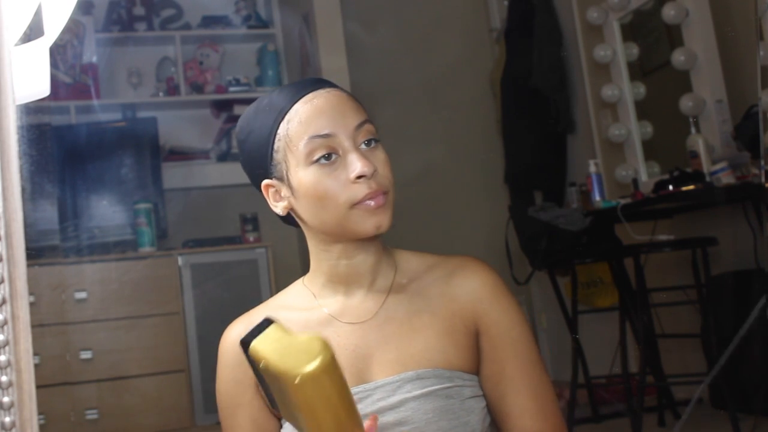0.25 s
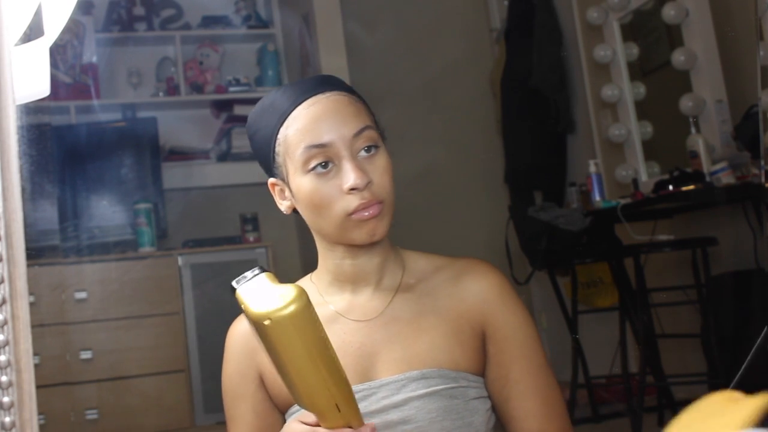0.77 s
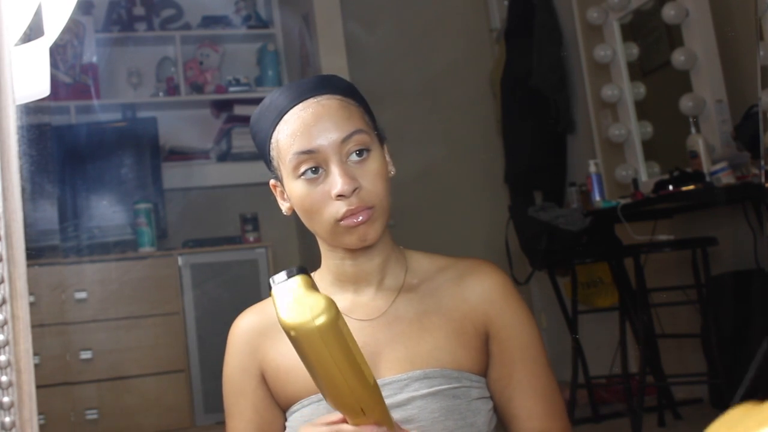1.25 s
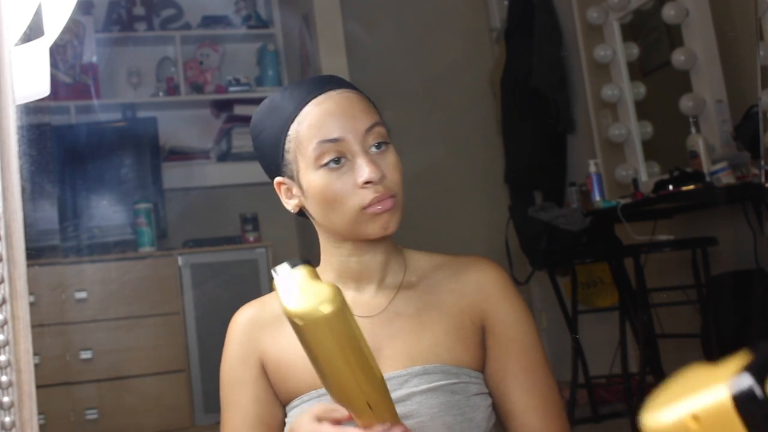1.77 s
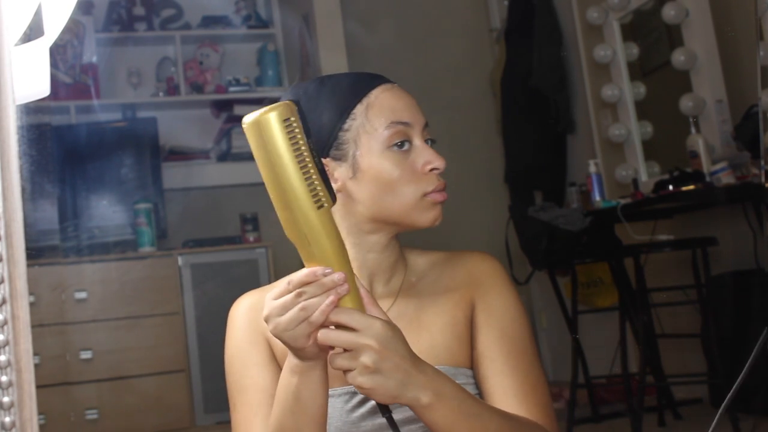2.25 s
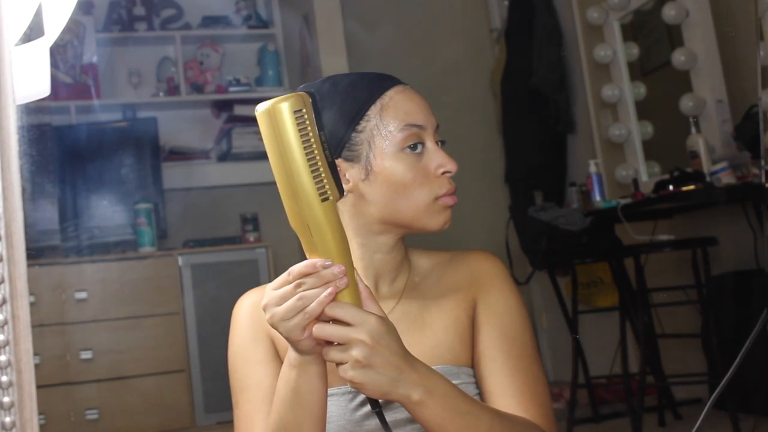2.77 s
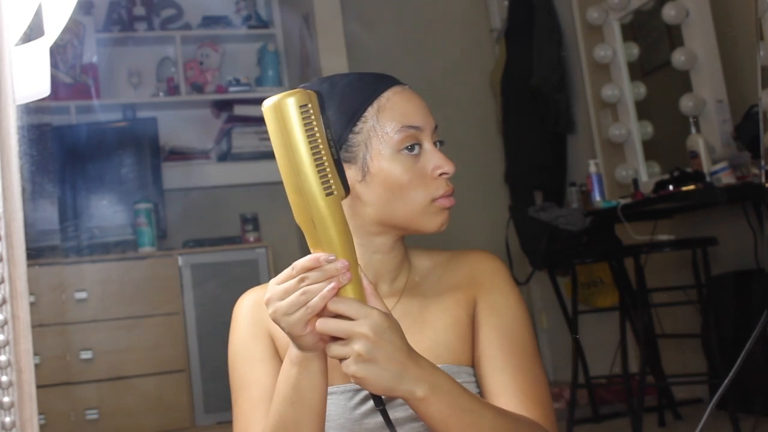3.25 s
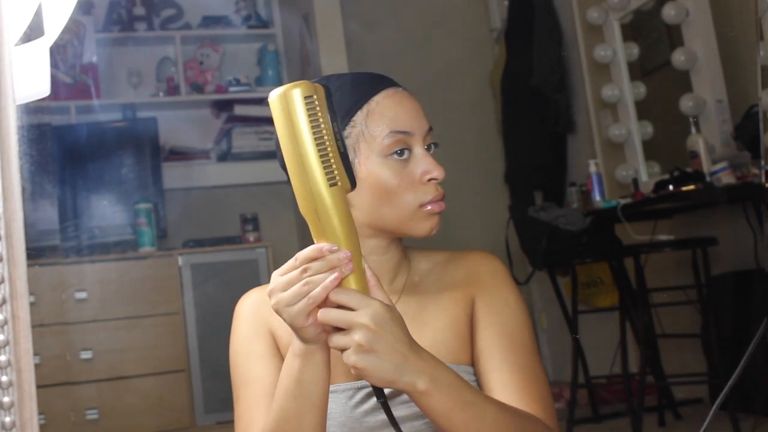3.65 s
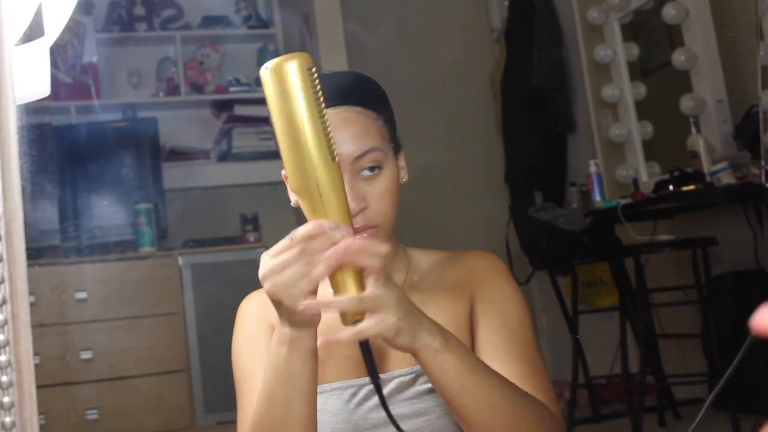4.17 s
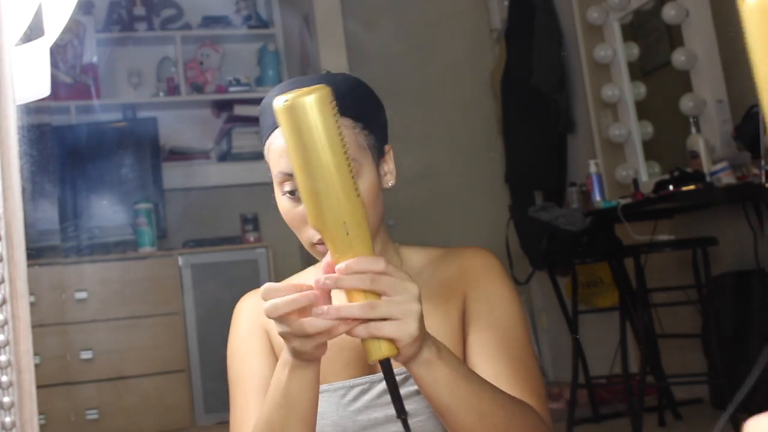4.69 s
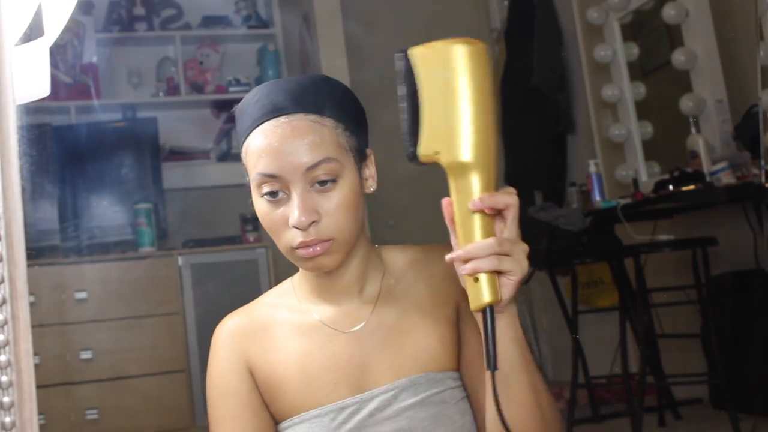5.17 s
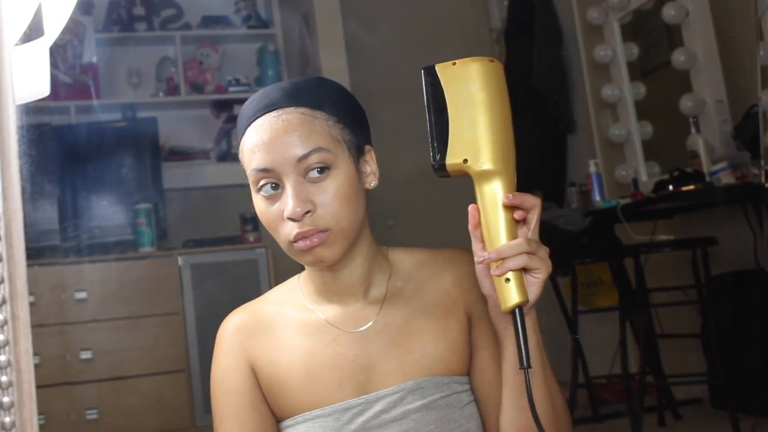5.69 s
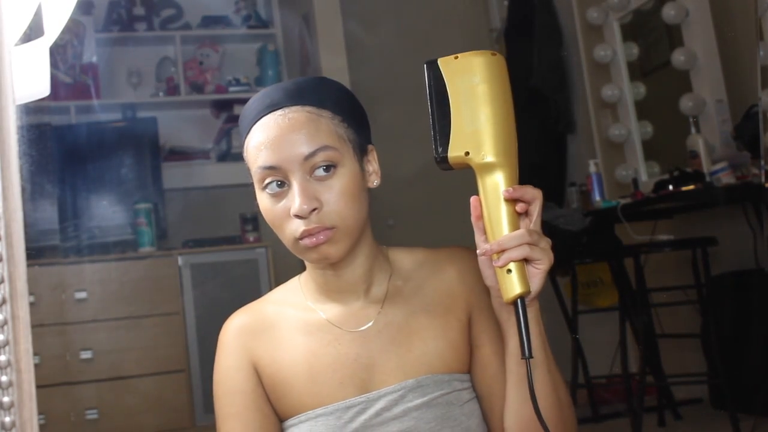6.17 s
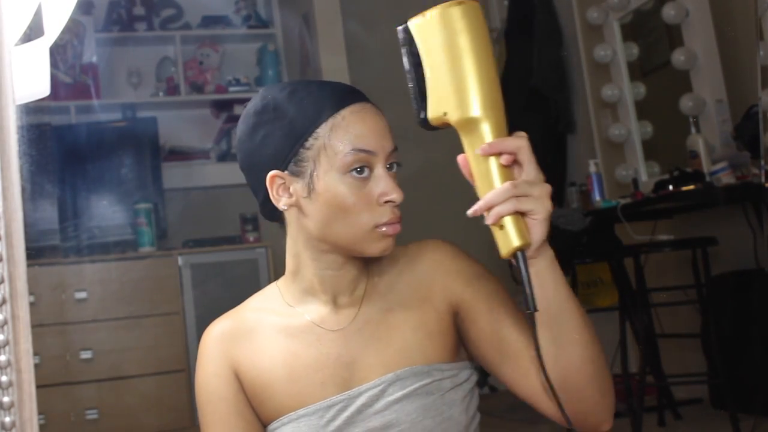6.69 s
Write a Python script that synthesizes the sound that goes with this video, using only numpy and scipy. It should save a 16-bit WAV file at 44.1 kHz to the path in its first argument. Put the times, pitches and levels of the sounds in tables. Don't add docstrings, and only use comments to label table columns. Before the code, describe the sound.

Quiet room tone and small plastic handling ticks come first, then two loud switch clacks close together. The hand-held dryer starts with a quick swelling whoosh and rising whir, settling within half a second into a dense, steady hiss with buzzy motor tones. Midway through, the nozzle swings round and the hiss gets a sharper, more hollow colour, with tiny dips as a hand crosses the intake. Close microphone, short dry room, no speech.

```python
import sys
import numpy as np
from scipy import signal
from scipy.fft import rfft, irfft
from scipy.io import wavfile
from scipy.ndimage import uniform_filter1d

SR = 44100
rng = np.random.default_rng(int(sys.argv[2]) if len(sys.argv) > 2 else 0)


def wav_record(signal):
    frames = np.transpose(np.atleast_2d(signal))
    bounded = np.clip(frames, -1, 1)
    quanta = np.round(bounded * 32767).astype(np.int16)
    wavfile.write(sys.argv[1], SR, quanta)


def linear_from_db(decibels):
    return 10 ** (np.asarray(decibels, float) / 20)


N = 305833
T = np.arange(N) / SR
AIR_ON_S = 1.39
TONE_SWITCH_S = 1.889


def level(x, db):
    return x * linear_from_db(db) / np.sqrt(np.mean(x ** 2))


def curve(table):
    s, *columns = np.transpose(table)
    return [np.interp(T, s, c) for c in columns]


def colour_db(points, hz):
    f, db = np.transpose(points)
    return np.interp(np.log(hz + 1), np.log(f), db)


def bell(x, centre, width):
    return np.exp(-.5 * ((x - centre) / (.5 * width)) ** 2)


def walk(rate, count, size):
    k = max(int(rate), 1)
    x = rng.standard_normal((count, size))
    x = uniform_filter1d(uniform_filter1d(x, k), k)
    return x / x.std()


def shaped(gain_db, size=1024):
    hz, s, spec = signal.stft(rng.standard_normal(N), SR, nperseg=size)
    at = np.minimum((s * SR).astype(int), N - 1)
    noise = signal.istft(spec * linear_from_db(gain_db(hz[:, None], at)), SR, nperseg=size)[1][:N]
    return level(noise, 0)


def ring(x, hz, t60):
    pole = np.exp(2j * np.pi * hz / SR - np.log(1000) / (t60 * SR))
    return signal.lfilter([1], [1, -pole], x).imag


def patches(hz, at, width_hz, hold, patchy_db):
    grid = walk(hold, count=400, size=len(at))
    row = np.minimum(hz[:, 0] / width_hz, 399).astype(int)
    return patchy_db * grid[row]


# time in seconds, shaft speed in Hz under back pressure, air level in dB,
# turn of the nozzle from 0 to 1, housing whine in dB.
HOLD = [(1.9, 337, -21, .1, -8), (2.15, 336.3, -19.5, 0.04, -10), (2.3, 337, -20, 0.02, 3.5),
        (2.62, 334.4, -19.5, 0, 0.5), (2.7, 337.3, -19.5, 0, 2), (3.52, 334.6, -19.8, 0, 0.3),
        (3.56, 337.3, -19, 0, 2), (4.24, 335.1, -20, 0.07, 2), (4.38, 334.7, -19.5, 0.13, -7),
        (4.74, 329.3, -20.5, 0.18, -3.5), (4.93, 334.8, -20, 0.26, -6), (5.08, 347.5, -21, .52, -5),
        (5.5, 339.9, -21, 1, -12), (5.7, 337, -21, 0.96, -12), (5.87, 339.7, -20.5, 1, -3.5),
        (6.1, 337.5, -21.5, .95, -9), (6.7, 338, -21, 0.92, -10), (6.93, 336.7, -20.5, 0.3, -7)]
# centre in seconds, level change in dB.
AIR_DIPS = [
    (4.585, -1),
    (5.4, -0.3),
    (6.75, -1),
]


def fan_motion():
    motor_on_s, spin_up_s, free_hz, full_hz = 1.317, .245, 352, 337
    loaded, air_db, turn, whine_db = curve(HOLD)
    turn = np.clip(turn, 0, 1)
    after = np.clip((T - TONE_SWITCH_S) / .012 + .5, 0, 1)
    shaft = np.clip(free_hz * (1 - np.exp(-(T - motor_on_s) / spin_up_s)), 50, loaded)
    speed = np.log10(np.minimum(shaft / full_hz, 1)) * (1 - after)
    air_db = air_db + 73.5 * speed + (1 - after)
    air_db = air_db - 9 * np.exp(-np.abs(T - AIR_ON_S) / .033)
    air_db = air_db + sum(db * bell(T, s, .028) for s, db in AIR_DIPS)
    whine_db = whine_db + 48 * speed - 4 * (1 - after)
    return shaft, loaded, speed, turn, after, air_db, whine_db


# centre in seconds, length in seconds, frequency in Hz, level in dB.
GLANCES = [(1.58, 0.19, 1460, 8), (1.7, .36, 2640, 6), (1.63, .12, 2950, 3.5), (1.95, 0.18, 5650, 8),
           (2.6, 0.8, 4450, 1.5), (3.6, 0.5, 8700, 3), (3.7, 0.45, 5250, 4), (4.0, 0.29, 2087, 5),
           (4.496, .39, 6240, 5.5), (4.749, 0.32, 5730, 7.5), (5.1, 0.22, 4450, 6), (5.3, 0.4, 6816, 5.5),
           (5.42, 0.36, 5530, 5.5), (5.05, 0.25, 715, 3), (1.98, .2, 4200, 2), (5.5, .29, 4400, 3),
           (6.1, 0.22, 5100, 2), (6.35, 0.27, 3000, 5), (6.551, .35, 7626, 5), (6.58, 0.18, 2210, 3)]


def glances(hz, at):
    return sum(db * bell(hz, f, 220) * bell(T[at], s, length) for s, length, f, db in GLANCES)


# frequency in Hz, spectral density in dB per Hz.
AIR_START = [(24, -56), (40, -31), (237, -11), (329, -7.5), (363, -7.5), (751, -5.5), (965, -9),
             (1370, -3.5), (3140, -7), (8990, -15), (13100, -27.5), (14800, -40), (16000, -73)]
AIR_SIDE = [(18, -81), (30, -60), (226, -22), (264, -24.5), (326, -23), (362, -19.5), (596, -8),
            (1210, -6.5), (1340, -5.5), (1840, -6), (1990, -3), (3280, -4), (3640, -5), (7780, -7.5),
            (15800, -15.5)]
AIR_TURNED = [(18, -84), (30, -58), (111, -30), (326, -18), (372, -19), (662, -11), (1240, -8),
              (1340, -9.5), (1840, -7.5), (1990, -8), (2390, -3.5), (2950, 4), (3190, -5.5), (6310, -5.5),
              (15800, -12.5)]
# frequency in Hz, width in Hz, level in dB with nozzle sideways, level in dB with nozzle turned.
DUCT = [(1390, 340, 0, 4), (1885, 450, -5.5, -3.5), (2820, 540, 1.5, -4.5), (4660, 150, 2, 2),
        (5250, 340, 0.5, 1.5), (5500, 290, 0, 0), (6300, 250, -2.5, 3.5), (4940, 150, -2, -3),
        (7100, 210, -2.5, -2.5), (8010, 230, 3, 1.5), (10900, 600, -1, 0.5), (12700, 650, 2, 5),
        (14700, 2100, 3, 2.5)]


def air_rush(shaft, turn, after, air_db):
    swing = 4 * turn * (1 - turn)
    overshoot = np.exp(-np.maximum(T - TONE_SWITCH_S, 0) / .07)
    bass = .6 + 3 * swing
    middle = -1.13 - 2 * overshoot - .8 * turn
    treble = -1.9 + swing + 3.5 * overshoot

    def running(hz, at):
        db = (1 - turn[at]) * colour_db(AIR_SIDE, hz) + turn[at] * colour_db(AIR_TURNED, hz)
        db = db + sum(bell(hz, f, w) * (a + (b - a) * turn[at]) for f, w, a, b in DUCT)
        db = db + bass[at] / (1 + (hz / 900) ** 2)
        db = db + middle[at] * bell(hz, 2480, 1450)
        db = db + treble[at] / (1 + (9000 / (hz + 1)) ** 4)
        fine = patches(hz, at, 65., hold=25., patchy_db=1.2)
        coarse = patches(hz, at, 700., hold=20., patchy_db=.35)
        return db + glances(hz, at) + fine + coarse

    def starting(hz, at):
        tilt = -.042 * np.maximum(280 - shaft[at], 0) * np.log2(1 + hz / 1500)
        ripple = patches(hz, at, 130., hold=8., patchy_db=1.7)
        return colour_db(AIR_START, hz) + tilt + glances(hz, at) + ripple

    gusts = linear_from_db(0.36 * walk(1600.0, count=1, size=N)[0])
    rush = np.sqrt(1 - after) * shaped(starting) + np.sqrt(after) * shaped(running)
    return rush * gusts * linear_from_db(air_db)


# multiple of shaft speed, level in dB with nozzle sideways,
# level in dB with nozzle turned, phase wobble in radians.
SHAFT_ORDERS = [(1, -49.5, -54, 0.36), (2, -48, -41, 0.41), (4, -35, -32.5, 0.37), (5, -45, -36.5, 0.23),
                (6, -36.5, -34, 0.9), (7, -41, -53, 0.28), (9, -38.5, -32, 0.41), (11, -41, -37.5, 0.41),
                (12, -38, -36, 0.79), (15, -55, -51, .9), (19, -55, -37, .9), (20, -37, -56, .9)]


def fan_tones(shaft, loaded, speed, turn, after, air_db, whine_db):
    jitter = 0.00118 * walk(1540.0, count=1, size=N)[0]
    angle = 2 * np.pi * np.cumsum(shaft * (1 + jitter)) / SR
    drift = walk(56.0, count=2 * len(SHAFT_ORDERS) + 6, size=N // 32 + 1)
    drift = np.repeat(drift, 32, axis=1)[:, :N]
    tones = 0
    for k, (order, side_db, turned_db, wobble) in enumerate(SHAFT_ORDERS):
        db = side_db + (turned_db - side_db) * turn ** 0.55
        db = db + 1.4 * drift[2 * k] - 3.5 * order / 10 * (1 - after)
        tones = tones + linear_from_db(db) * np.sin(order * angle + wobble * drift[2 * k + 1])
    tones = tones * linear_from_db(1.53 * (air_db + 19)) * (0.33 + 0.68 * after)

    housing_db = -31.5 + whine_db + 0.88 * drift[-1] + 2.0 * walk(900., count=1, size=N)[0]
    tones = tones + linear_from_db(housing_db) * np.sin(10 * angle + 0.32 * drift[-2])

    settle = np.exp(-np.maximum(T - TONE_SWITCH_S, 0) / .05)
    blade_run_db, blade_start_db = -55, -34
    blade_db = blade_run_db + (blade_start_db - blade_run_db) * settle + 98 * speed
    stator_db = -46 + 5 * bell(T, 2.1, .35) + 450 * np.log10(np.minimum(shaft / loaded, 1))
    for k, (order, db) in enumerate([(30, blade_db), (40, stator_db)]):
        phase = order * angle + .8 * drift[-4 - 2 * k]
        tones = tones + linear_from_db(db + 3.4 * drift[-3 - 2 * k]) * np.sin(phase)
    return np.sqrt(2) * tones


def dryer():
    shaft, loaded, speed, turn, after, air_db, whine_db = fan_motion()
    air = air_rush(shaft, turn, after, air_db)
    tones = fan_tones(shaft, loaded, speed, turn, after, air_db, whine_db)
    return (air + tones) * (T > AIR_ON_S)


# start in seconds, peak in dB, ring in Hz, crack level in dB, contact time in milliseconds.
TAPS = [(.194, -35, 1660, -12, 4.9), (.571, -38, 1010, -8, 4), (.646, -40, 775, 4.5, 1.1),
        (.694, -38, 780, -11, 1), (.787, -51, 1000, 0, 1.1), (1.013, -24.5, 775, -17, 2.1),
        (1.132, -28, 1350, 3, 1.8), (1.142, -38, 800, -4, 1.4), (1.176, -31, 764, -24, 1.6),
        (1.229, -34, 1350, -3, 7.6), (1.247, -7, 860, 9, 2.8), (1.2575, -16, 2000, 6, 1.4),
        (1.2755, -12, 2150, 7.5, 1.8), (1.279, -18, 1530, 9, 3.4), (1.28, -16.5, 810, -3, 1.5),
        (1.3644, -13.5, 1440, 5.5, 2.9), (1.367, -3.5, 1470, 2, 1.9), (1.3765, -20.5, 805, 6, 1.5)]
# frequency in Hz, level in dB, decay time T60 in seconds.
SHELL = [(775, -3, .022), (1140, -5, .014), (1430, 3, .022), (2030, 2, 0.014), (2560, -6, 0.012)]
# frequency in Hz, level in dB.
CRACK = [(300, -40), (600, -32), (2000, 2.5), (3600, 1.5), (5500, -3.5), (7500, 1), (9500, -1.5),
         (11000, -10), (16000, -31)]


def switch_contacts():
    out, t = np.zeros(N), np.arange(4096) / SR
    chance = rng.standard_normal((len(TAPS), len(t)))
    chance = chance * np.repeat(np.abs(chance[:, ::32]) ** .4, 32, axis=1)
    crisp = linear_from_db(colour_db(CRACK, np.fft.rfftfreq(len(t), 1 / SR)))
    for (s, peak_db, ring_hz, crack_db, contact_ms), noise in zip(TAPS, chance):
        tau = max(contact_ms, .3) / 1000
        envelope = t / tau * np.exp(-t / tau)
        scrape = noise * envelope
        shell = sum(linear_from_db(db) * ring(scrape, f, t60) for f, db, t60 in SHELL)
        ring_s = np.clip(.014 - 0.1 * peak_db, .005, .03)
        body = level(shell, 0.27 * crack_db) + level(ring(scrape, ring_hz, ring_s), 0)
        crack = irfft(rfft(noise) * crisp) * envelope
        hit = body / np.abs(body).max() + linear_from_db(crack_db) * crack / np.abs(crack).max()
        i = int(s * SR)
        out[i:i + len(t)] += linear_from_db(peak_db) * hit
    out = signal.sosfilt(signal.butter(8, 640., "high", fs=SR, output="sos"), out)
    thump_hz, thump_t60_s = 470, 0.019
    thump = ring(bell(T, 1.247, .0003), thump_hz, thump_t60_s)
    thump = ring(thump, thump_hz, thump_t60_s)
    return out + linear_from_db(-30.5) * thump / thump.max()


def reverberate(x):
    t60_s, treble_t60_s = 0.26, .17
    t = np.arange(int(.5 * SR)) / SR
    tail = rng.standard_normal(len(t)) * np.exp(-np.log(1000) * t / t60_s) * np.minimum(t / 0.011, 1)
    dull = signal.sosfilt(signal.butter(2, 3500., fs=SR, output="sos"), tail)
    extra_decay = np.exp(-np.log(1000) * t * (1 / treble_t60_s - 1 / t60_s))
    tail = dull + 1.03 * (tail - dull) * extra_decay
    return x + linear_from_db(-12) * signal.fftconvolve(x, tail / np.sqrt(np.sum(tail ** 2)))[:N]


def switch():
    return reverberate(switch_contacts())


# centre in seconds, length in seconds, level in dB.
RUSTLE = [
    (.05, .07, -63),
    (.2, .09, -63),
    (.565, .06, -65),
    (.665, .055, -64),
    (.98, .14, -64),
    (1.254, 0.02, -49),
]


def rustle():
    def friction(hz, at):
        bass_loss = 20 * np.log10(1 + 1500 / (hz + 1))
        return 5.4 * bell(hz, 8000, 9000) - bass_loss - 6 * (hz / 11500) ** 6 + 0 * at

    strokes = linear_from_db(-78) + sum(linear_from_db(db) * bell(T, s, length) for s, length, db in RUSTLE)
    return shaped(friction) * strokes * (T < 1.4)


# frequency in Hz, spectral density in dB per Hz.
ROOM = [(20, -34), (60, -14.5), (150, -17.5), (190, -16.5), (260, -11.5), (400, -14), (800, -20),
        (1500, -20.5), (2400, -22), (2800, -24.5), (9500, -38.5), (12500, -45), (15500, -55)]
# frequency in Hz, width in Hz, level in dB over the rush.
HUM = [(111, 13.3, 15), (228, 13, 10.5), (303, 45, 6.5), (969, 76, 10.5), (1760, 60, 5), (1890, 60, 9),
       (2300, 150, 2)]


def room_tone():
    def hum(hz, at):
        lift = sum(db * bell(hz, f, w) for f, w, db in HUM)
        return colour_db(ROOM, hz) + lift + patches(hz, at, 90., hold=2., patchy_db=.5)

    duck_db = -12 * bell(T, 1.44, .17)
    return shaped(hum, size=8192) * linear_from_db(-48 + duck_db - 8.5 * (T > TONE_SWITCH_S))


def scene():
    mono = dryer() + switch() + rustle() + room_tone()
    return np.array([mono, mono])


def top_cut(x):
    return signal.sosfilt(signal.butter(12, 16190, fs=SR, output="sos"), x)


def record(dry):
    mid = np.tanh(0.86 * dry[0]) / 0.74
    side, size, offset = np.zeros(N), 2048, 146
    start_s, count, low_edge_hz, high_edge_hz = 2.0, 48, 4200, 14500
    hz = np.fft.rfftfreq(size, 1 / SR)
    fade = signal.windows.kaiser_bessel_derived(size, 4 * np.pi)
    for k, (when, where, wide) in enumerate(rng.random((count, 3))):
        s = start_s + (N / SR - .06 - start_s) * (k + when) / count
        low_hz = low_edge_hz + (high_edge_hz - low_edge_hz) * where
        high_hz = low_hz + 800 + 800 * wide ** 2
        i = round((s * SR - offset) / 1024) * 1024 + offset - size // 2
        band = irfft(rfft(mid[i:i + size]) * (hz > low_hz) * (hz < high_hz))
        side[i:i + size] += linear_from_db(-.5) * fade * np.roll(band, size // 2)[::-1]
        mid[i:i + size] -= 0.42 * fade * band
    top = signal.ellip(10, .1, 80, 15780, fs=SR, output="sos")
    mix = signal.sosfilt(top, np.array([mid + side, mid - side]))
    return top_cut(mix)


dry = scene()
out = record(dry)
wav_record(out)
```